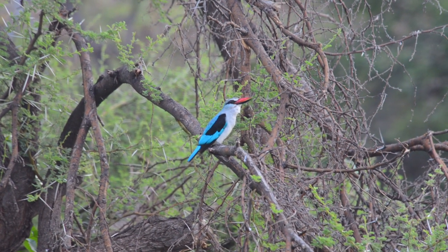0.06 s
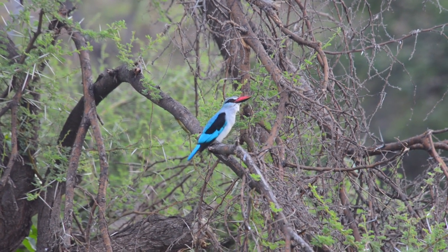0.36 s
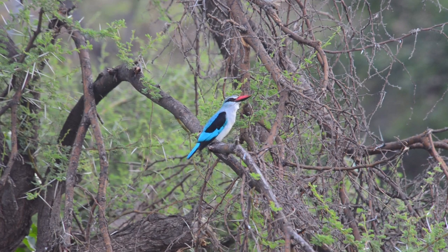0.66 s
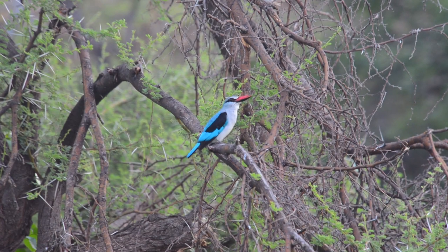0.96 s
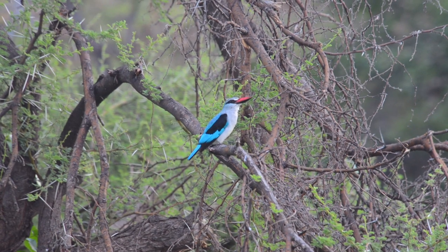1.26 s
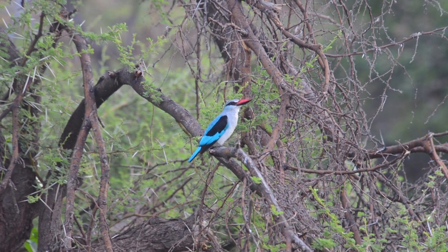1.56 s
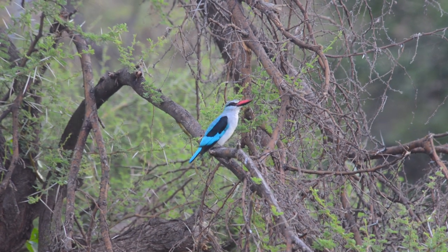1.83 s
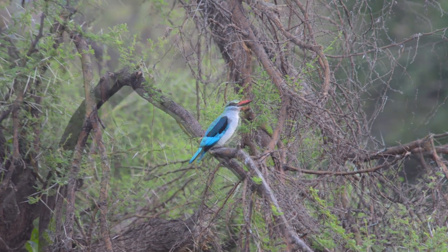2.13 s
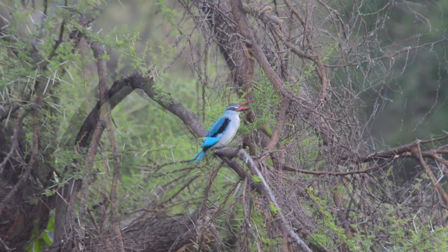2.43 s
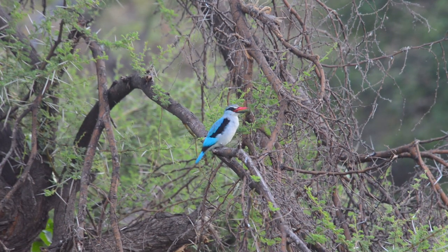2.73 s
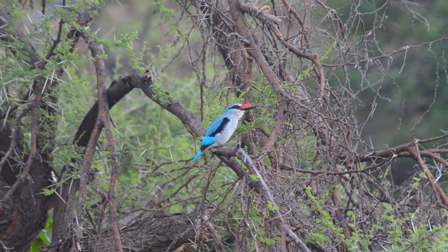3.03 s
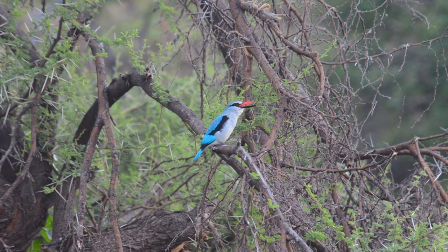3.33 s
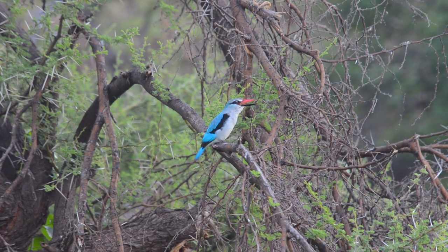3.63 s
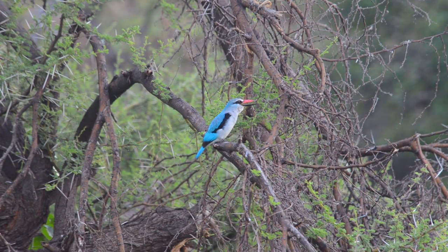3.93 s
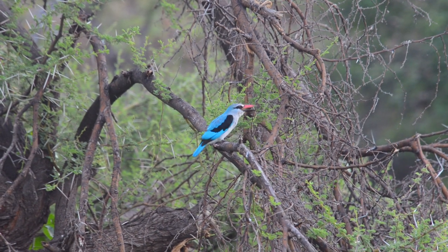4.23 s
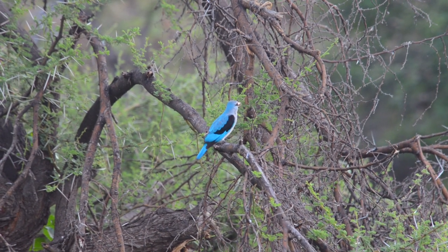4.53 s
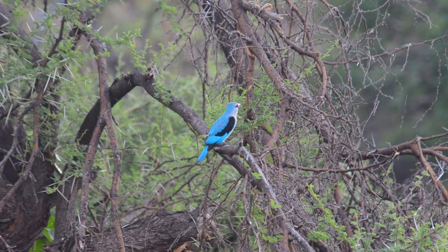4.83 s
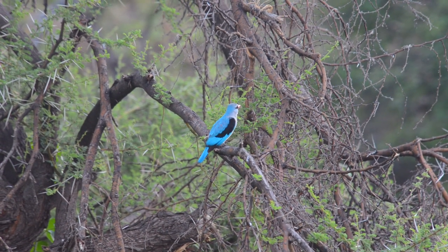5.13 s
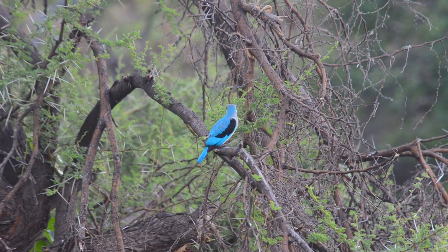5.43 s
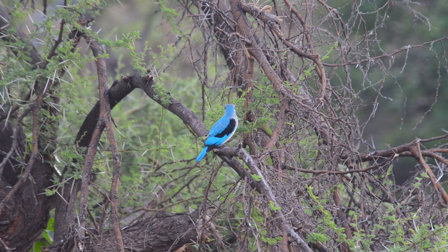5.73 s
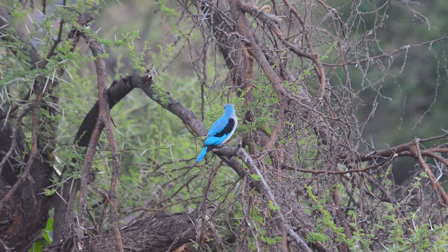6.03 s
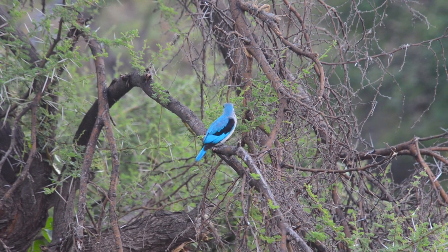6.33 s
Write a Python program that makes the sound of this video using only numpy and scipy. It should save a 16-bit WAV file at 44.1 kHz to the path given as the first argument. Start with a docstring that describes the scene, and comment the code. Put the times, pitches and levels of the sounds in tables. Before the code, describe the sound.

Close kingfisher trills and one loud, sharp note ring out above a faint chorus of chirping birds and purring doves in the bush.

```python
"""A woodland kingfisher on a branch ends one falling trill, gives a single sharp note, then a rattle
that clears into another trill. Its notes are sliding whistles that break into a rasp in the rattle
and as a trill runs out. Twigs and ground scatter its voice. Small birds chirp in the bush around it,
doves purr and coo further off, and something low grunts once over a soft outdoor hiss."""
import sys
import numpy as np
from scipy import signal
from scipy.fft import rfft, irfft
from scipy.io import wavfile

SR = 44100
rng = np.random.default_rng(int(sys.argv[2]) if len(sys.argv) > 2 else 0)


def wav_record(signal):
    """Record a signal, one row per channel, as 16-bit PCM in the file named by sys.argv[1]."""
    frames = np.transpose(np.atleast_2d(signal))
    bounded = np.clip(frames, -1, 1)
    # unit amplitude maps onto the largest positive 16-bit level
    quanta = np.round(bounded * 32767).astype(np.int16)
    wavfile.write(sys.argv[1], SR, quanta)


N = 285327
T = np.arange(N) / SR

# the kingfisher's trill and rattle notes: (time [s], level [dB])
TRILL_NOTES = [(.0038, -16), (.082, -19), (0.162, -15.5), (.242, -15), (0.3142, -17), (.392, -18),
               (.466, -21.5), (0.5425, -22), (.616, -26.5), (.69, -28.5), (3.6653, -8), (3.7198, -8.5),
               (3.77, -14), (3.8223, -15), (3.874, -16), (3.926, -18), (3.977, -17.5), (4.0286, -18.5),
               (4.082, -24), (4.131, -14.5), (4.1833, -16), (4.235, -15.5), (4.287, -15.5), (4.3394, -17),
               (4.3933, -15.5), (4.445, -15.5), (4.501, -15), (4.556, -14), (4.617, -13), (4.68, -12),
               (4.747, -10.5), (4.818, -11), (4.893, -13.5), (4.9713, -15), (5.0476, -16.5),
               (5.1247, -17.5), (5.201, -19), (5.2746, -22.5), (5.351, -24), (5.429, -23), (5.505, -23.5),
               (5.577, -26.5), (5.648, -29)]
# the pitch they land on, sinking through each trill: (time [s], pitch [Hz])
TRILL_PITCH = [(0, 2553), (.17, 2322), (.69, 2004), (3.666, 3445), (3.823, 2810), (4.03, 2763),
               (4.13, 2980), (4.4, 3190), (4.617, 3094), (4.68, 2858), (5.048, 2362), (5.274, 2310),
               (5.43, 2089), (5.648, 1946)]
# how clear or rough they are: (time [s], whistle length [s], closing rasp level [dB])
TRILL_VOICE = [(0, 0.025, -22), (.24, 0.018, -44), (.466, 0.021, -33.5), (.542, .016, -4.5),
               (.69, 0.023, 2), (3.666, .014, -5), (3.83, .0093, -5), (4.29, 0.0048, -4),
               (4.556, 0.0094, -3), (4.617, 0.014, -13), (4.68, .023, -40), (4.894, .018, -47),
               (5.429, 0.026, -43), (5.505, 0.017, 6)]
# what throat and bill let through of a whistle's upper harmonics: (frequency [Hz], gain [dB])
BILL_FILTER = [(5500, -24), (7400, -24.5), (8600, -40), (9900, -26.5), (11200, -49.5), (12300, -45),
               (14000, -53)]
# what the throat lets through of the rasp: (frequency [Hz], gain [dB])
THROAT_FILTER = [(900, -49), (1350, -14.5), (1900, -9.5), (2400, -2.5), (3100, -2.5), (4000, -14.5),
                 (5300, -9), (6500, -21), (8000, -24), (10500, -52), (14000, -53)]
# the tone of the outdoor hiss: (frequency [Hz], gain [dB])
AIR_COLOUR = [(15, -26), (25, -7), (116, 0), (349, -3), (550, -3), (895, -5.5), (1570, -6.5), (2080, -1),
              (2420, -8.5), (3100, -9), (4000, -5), (5100, -2), (6900, -11.5), (7800, -15.5),
              (11000, -19.5), (15500, -21)]
# puffs of a light breeze: (peak time [s], half length [s], level [dB])
BREEZE_PUFFS = [(2.21, .04, -55), (3.74, 0.27, -58), (4.047, .04, -48), (5.493, 0.054, -55.5)]
# the distant bird chorus: (time [s], chirp level [dB], background blur level [dB])
CHORUS_LEVELS = [(0, -50, -47.5), (.9, -40.5, -43.5), (1.3, -56, -47), (1.65, -60, -44.5),
                 (2, -54.5, -49.5), (3.2, -52.5, -64), (4.4, -42, -56), (5.4, -48.5, -50.5),
                 (6.47, -53.5, -58)]
# the tone of that chorus: (frequency [Hz], gain [dB])
CHORUS_TONE = [(1500, -23.5), (2100, -12), (2900, -11), (4200, -9), (5100, -4), (6400, -7.5), (7500, -17),
               (10000, -34)]
# small birds' downward slides: (time [s], length [s], starting pitch [Hz], level [dB])
SLIDE_CALLS = [(0.142, 0.11, 6600, -36.5), (0.864, 0.074, 6570, -34), (1.208, 0.035, 2495, -40.5),
               (1.519, 0.064, 5820, -40), (1.66, 0.085, 4550, -42), (2.963, 0.031, 3670, -37),
               (3.183, 0.06, 8000, -51), (5.423, 0.041, 6800, -39), (5.599, 0.038, 3950, -36),
               (5.794, 0.084, 6300, -42.5), (6.25, 0.073, 6500, -48)]
# their short, high "tsip" calls: (time [s], level [dB])
TSIP_CALLS = [(.294, -31), (1.204, -31), (1.554, -38), (1.64, -29), (1.702, -33.5), (2.059, -31.5),
              (2.667, -36.5), (3.164, -39), (4.673, -41)]
# a far whistler's rolled notes: (time [s], level [dB])
ROLL_CALLS = [(.6, -37), (1.216, -48), (1.697, -50), (2.16, -47), (2.888, -49), (3.735, -29), (4.719, -44),
              (6.22, -38.5)]
# small birds' thin whistles: (time [s], length [s], pitch [Hz], level [dB])
WHISTLE_CALLS = [(0.726, .2, 4470, -40), (0.995, .08, 5090, -31), (1.082, .1, 4980, -40),
                 (3.112, 0.062, 3460, -42), (5.1, 0.16, 7460, -49), (5.373, 0.062, 4730, -44),
                 (5.764, 0.062, 3454, -36)]
# their buzzes: (time [s], length [s], pitch [Hz], level [dB])
BUZZ_CALLS = [(.8, 0.17, 4450, -44), (1.405, 0.2, 6090, -42.5), (2.15, 0.11, 4350, -44),
              (2.928, .025, 4050, -34), (3.57, 0.13, 5120, -35.5), (3.877, 0.077, 5070, -36.5),
              (4.93, 0.05, 5200, -33), (5.513, 0.082, 5170, -39)]
# their steep "chip" calls: (time [s], level [dB])
CHIP_CALLS = [(0.812, -33.5), (1.066, -34.5), (1.316, -33.5), (1.563, -36), (1.814, -33), (2.067, -35.5),
              (2.435, -37), (2.672, -35), (5.02, -38.5), (5.277, -38), (5.53, -38.5), (6.033, -37.5),
              (6.284, -37.5)]
# short, soft far coos: (time [s], top pitch [Hz], level [dB])
FAR_COOS = [(.912, 1867, -41), (3.575, 908, -41), (4.047, 1920, -38), (4.368, 2120, -35), (4.83, 932, -42),
            (6.044, 943, -44), (6.25, 1055, -45), (6.351, 1098, -40), (6.452, 1043, -38)]
# purrs in a dove's phrase: (time into phrase [s], length [s], pitch [Hz], swing [Hz], level [dB])
PHRASE_PURRS = [(0, 0.382, 841, 160.5, -40.5), (0.481, 0.414, 883, 124.5, -49.5)]
# coos in that phrase: (time into phrase [s], length [s], top pitch [Hz], level [dB])
PHRASE_COOS = [(.485, 0.0426, 824, -47), (0.956, 0.069, 935, -39.5)]
# short, dry croaks: (time [s], level [dB])
CROAK_CALLS = [(3.439, -37), (3.476, -41), (3.535, -41.5), (3.572, -34)]


def undb(db):
    """Turn decibels into a number to multiply by."""
    return 10 ** (np.asarray(db) / 20)


def unit(x):
    """Scale x to an average strength (rms) of 1."""
    return x / np.sqrt(np.mean(x ** 2))


def add(out, start, x):
    """Mix x into out from the start time on."""
    i = max(0, int(start * SR))
    out[i:i + len(x)] += x[:max(0, N - i)]


def curves(table):
    """Join a timed table's points into one curve for each column after the time."""
    times, *columns = np.transpose(table)
    return [np.interp(T, times, column) for column in columns]


def response(hz, points):
    """How much a (frequency, gain) table lets through at hz."""
    frequencies, db = np.transpose(points)
    return undb(np.interp(np.log(hz + 1), np.log(frequencies), db))


def noise(points):
    """Noise of strength 1, coloured by a (frequency, gain) table."""
    spectrum = rfft(rng.standard_normal(N)) * response(np.fft.rfftfreq(N, 1 / SR), points)
    return unit(irfft(spectrum, N))


def wander(rate):
    """A random curve of strength 1 that heads for a new value rate times a second."""
    return unit(np.interp(T * rate, np.arange(N), rng.standard_normal(N)))


def phase_of(hz):
    """Add up a gliding pitch into the angle of its wave."""
    return 2 * np.pi * np.cumsum(hz) / SR


def gate(t, length, attack, release):
    """Fade in from time 0 and fade out around the given length."""
    opening = np.sin(np.pi / 2 * np.clip(t / attack, 0, 1))
    closing = np.sin(np.pi / 2 * np.clip((length - t) / release + .5, 0, 1)) ** 2
    return opening * closing


def whistle(phase, overtones_db):
    """A tone plus its harmonics: quieter tones at 2, 3, ... times its pitch."""
    overtones = sum(undb(db) * np.sin(k * phase) for k, db in enumerate(overtones_db, 2))
    return np.sin(phase) + overtones


def trill(scoop_hz=3750, scoop_share=.669, scoop_s=.0029, curl=.073, rasp_s=.01255):
    """Each kingfisher note scoops down onto its pitch; rough ones then break to a low, falling rasp."""
    out, t = np.zeros(N), T[:SR // 16]
    jitter, shimmer, grit = .02 * wander(2500), wander(900), noise(THROAT_FILTER)
    controls = np.array(curves(TRILL_PITCH) + curves(TRILL_VOICE))
    for start, db in TRILL_NOTES:
        here = int(start * SR) + np.arange(len(t))
        hz, clear_s, rasp_db = controls[:, here[0]]
        # short notes keep falling, long ones curl up again
        short = clear_s < .015
        bend = -.05 * t / clear_s if short else curl * np.clip(2 * t / clear_s - 1, 0, 2) ** 2
        pitch = hz * (1 + bend) + scoop_share * (scoop_hz - hz) * np.exp(-t / scoop_s)
        phase = phase_of(pitch * (1 + .31 * jitter[here]))
        # higher notes have a stronger second harmonic
        second_db = -21 + 17 * np.log2(hz / 2500)
        tone = whistle(phase, [second_db]) * gate(t, clear_s, .0083, .15 * clear_s)
        # the thin, husky top of the voice varies less from note to note
        top = sum(response(k * pitch, BILL_FILTER) * np.sin(k * phase) for k in range(3, 6))
        top_db = 1 - 1.5 * short - .2 * (db + 17.5) + 3.3 * shimmer[here]
        top *= undb(top_db) * gate(t, clear_s, .009, .38 * clear_s)
        # higher notes break to a higher rasp
        since_break = np.maximum(t - clear_s, 0)
        rasp_hz = 1880 * (hz / 3000) ** .369 * np.exp(-.334 * np.minimum(since_break / rasp_s, 1.2))
        rasp_phase = phase_of(rasp_hz * (1 + jitter[here]))
        # weak notes are duller; the throat delays each harmonic differently (k * k)
        dull_db = 8.5 * min(0, db + 20)
        buzz = sum(response(k * rasp_hz, THROAT_FILTER) * undb(dull_db * (k - 1))
                   * np.sin(k * rasp_phase + k * k) for k in range(1, 7))
        rasp = buzz + undb(dull_db - 17) * grit[here]
        rasp *= undb(rasp_db + 2 * shimmer[here]) * gate(since_break, rasp_s, .00016, .0038)
        add(out, start, undb(db) * (tone + top + rasp))
    return out


def perch(x):
    """The trunk and the ground each return one quick echo, a further tree a late one."""
    out = x.copy()
    for delay_s, db in [(.0065, -17.5), (.0135, -23.5), (.058, -42.5)]:
        add(out, delay_s, undb(db) * x)
    return out


def bush(x, twigs_db, twigs_s, trees_db, trees_s):
    """Add a quick scatter from twigs and a faint tail from trees; each takes its time to fall 60 dB."""
    colour = [(100, 6.5), (6000, -12), (10000, -4), (16000, -8.5)]
    echo = 0
    for db, decay_s, onset_s in ((twigs_db, twigs_s, .008), (trees_db, trees_s, .04)):
        shape = np.minimum(T / onset_s, 1) ** 2 * undb(-60 * T / decay_s)
        patchy_tail = noise(colour) * shape * undb(2.5 * wander(90))
        echo = echo + undb(db) * unit(patchy_tail) / np.sqrt(N)
    return x + signal.fftconvolve(x, echo[:2 * SR])[:N]


def air(hiss_db=-48, calm_db=-72):
    """A soft, steady hiss, with a light breeze rumbling in puffs underneath."""
    puffs = sum(undb(db) * np.exp(-((T - peak) / half) ** 2) for peak, half, db in BREEZE_PUFFS)
    rumble = noise([(20, 4), (50, 24.5), (100, 11), (200, -14), (1000, -79)])
    return noise(AIR_COLOUR) * undb(hiss_db) + rumble * (undb(calm_db) + puffs)


def chirp(length, from_hz, to_hz, waver, fade=.58):
    """A thin, unsteady, gliding whistle; fade is the share of its length spent dying away."""
    t = T[:int(1.6 * length * SR)]
    unsteady = np.interp(t * 700, np.arange(512), rng.standard_normal(512))
    pitch = from_hz * (to_hz / from_hz) ** (t / length) * (1 + waver * unsteady)
    return np.sin(phase_of(pitch)) * gate(t, length, .12 * length, fade * length)


def chorus(count=600, spread_db=8):
    """Many far birds: mostly falling chirps over a noisy blur of still further ones."""
    out = np.zeros(N)
    chirps_db, blur_db = curves(CHORUS_LEVELS)
    # they call all the time: one chirp somewhere in each short stretch
    for k, (when, high, long, fall, loud) in enumerate(rng.random((count, 5))):
        hz = 2800 + 4400 * high
        call = chirp(.006 + .02 * long, hz, hz * (1.08 - .36 * fall), waver=.014)
        gain = undb(spread_db * loud ** 2) * response(hz, CHORUS_TONE)
        add(out, (k + when) / count * N / SR, gain * call)
    voices = unit(bush(out, twigs_db=-4.5, twigs_s=.053, trees_db=-13, trees_s=.3))
    blur = noise(CHORUS_TONE) * undb(.54 * wander(18))
    return undb(chirps_db) * voices + undb(blur_db) * blur


def slides(octaves_per_s=9.7):
    """Small birds' whistles that all slide down at one pace."""
    out = np.zeros(N)
    for start, length, hz, db in SLIDE_CALLS:
        add(out, start, undb(db) * chirp(length, hz, hz / 2 ** (octaves_per_s * length), waver=.026))
    return out


def throb(call, rate_hz=175, depth=.46):
    """Shake a call's loudness fast enough to make it buzz."""
    return call * (1 + depth * np.sin(2 * np.pi * rate_hz * T[:len(call)]))


def tsips(high_hz=6150, low_hz=4850, flick_s=.0087):
    """A tiny upward flick, a quick stroke back down, then a buzzing slur."""
    out = np.zeros(N)
    for start, db in TSIP_CALLS:
        add(out, start - flick_s, undb(db - 7) * chirp(flick_s, low_hz, high_hz, waver=.012))
        add(out, start, undb(db) * chirp(.0187, high_hz, low_hz, waver=.023))
        add(out, start + .032, undb(db - 3) * throb(chirp(.036, 5450, 4780, waver=.06)))
    return out


def purr(length, hz, swing_hz, rolls_per_s=35, unsteady_hz=22):
    """A note whose pitch and loudness roll quickly; it starts high and soon settles."""
    t = T[:int(1.2 * length * SR)]
    roll = (t * rolls_per_s) % 1
    high_start = .75 * np.exp(-t / .09)
    pitch = hz + swing_hz * (1 - 2 * roll + high_start) + unsteady_hz * wander(200.6)[:len(t)]
    return np.sin(phase_of(pitch)) * np.sin(np.pi * roll) * gate(t, length, .0033, .33 * length)


def far_whistler():
    """A far bird that keeps to one rolled note."""
    out = np.zeros(N)
    for start, db in ROLL_CALLS:
        add(out, start, undb(db) * purr(length=.122, hz=2040, swing_hz=40))
    return out


def thin_whistles(sag=.019):
    """Small birds hold a note that sinks just a little."""
    out = np.zeros(N)
    for start, length, hz, db in WHISTLE_CALLS:
        add(out, start, undb(db) * chirp(length, hz, hz * (1 - sag), waver=.011, fade=.34))
    return out


def buzzes(sag=.019):
    """Held notes made rough by a shaky pitch and a fast throb."""
    out = np.zeros(N)
    for start, length, hz, db in BUZZ_CALLS:
        add(out, start, undb(db) * throb(chirp(length, hz, hz * (1 - sag), waver=.043, fade=.55)))
    return out


def chips():
    """Very short, pure whistles that drop steeply."""
    out = np.zeros(N)
    for start, db in CHIP_CALLS:
        add(out, start, undb(db) * chirp(length=.0135, from_hz=5450, to_hz=2650, waver=.008, fade=.85))
    return out


def coo(length, hz, arch=.374):
    """A soft note whose pitch rises and falls in an arch."""
    t = T[:int(1.2 * length * SR)]
    pitch = hz * (1 - arch * (t / length - .42) ** 2)
    return np.sin(phase_of(pitch)) * gate(t, length, .074 * length, .87 * length)


def far_coos():
    """Short, soft far coos: some open the dove's purrs, others stand alone."""
    out = np.zeros(N)
    for start, hz, db in FAR_COOS:
        add(out, start, undb(db) * coo(length=.043, hz=hz))
    return out


def doves(count=4, first_s=2.228, period_s=1.345, heard_from_s=2.31):
    """One phrase over and over: a strong purr, a soft purr opening with a low coo, a higher coo."""
    out = np.zeros(N)
    for phrase in first_s + period_s * np.arange(count):
        for after, length, hz, swing_hz, db in PHRASE_PURRS:
            add(out, phrase + after, undb(db) * purr(length, hz, swing_hz))
        for after, length, hz, db in PHRASE_COOS:
            add(out, phrase + after, undb(db) * coo(length, hz))
    return out * (T > heard_from_s)


def sharp_note(start_s=2.799, level_db=-7.5, from_hz=4310, to_hz=2668, attack_s=.026, fade_s=.099):
    """One loud kingfisher whistle swells, slides down to a held pitch and fades, growing purer."""
    t = np.clip(T - start_s, 0, 3 * fade_s)
    glide_hz = to_hz + (from_hz - to_hz) * np.exp(-(t / .045) ** 1.35)
    pitch = glide_hz * (1 + .0029 * wander(600))
    tone = whistle(phase_of(pitch), [db - 45 * t for db in (-13, -30, -43, -44)])
    swell_db = -17 * np.maximum(1 - (t / attack_s) ** 2.2, 0)
    fade_db = -16 * (np.maximum(t - attack_s, 0) / fade_s) ** 2.4
    flutter_db = wander(150)
    return tone * undb(level_db + swell_db + fade_db + flutter_db) * (T > start_s)


def grunt(start_s=3.335, gain_db=-47, from_hz=148, to_hz=89.4, length_s=.21, fade_db_per_s=75):
    """A far, low, falling voice whose three harmonics are shaped by the throat."""
    t = np.maximum(T - start_s, 0)
    hz = to_hz + (from_hz - to_hz) * np.exp(-(t / .062) ** 2)
    throat = [(85, 11), (130, -1), (190, 14.5), (260, -7), (400, -41)]
    voice = sum(response(k * hz, throat) * np.sin(k * phase_of(hz)) for k in range(1, 4))
    return voice * undb(gain_db - fade_db_per_s * t) * gate(t, length_s, .033, length_s / 2)


def croaks(decay_s=.01):
    """Toneless rasps: bursts of noise that start at once and die quickly."""
    rasp = noise([(700, -17), (1200, -2.5), (1600, 7), (2300, -9), (3100, -5.5), (5000, -6), (9000, -37)])
    return rasp * sum(undb(db) * (T > start) * np.exp(-np.abs(T - start) / decay_s)
                      for start, db in CROAK_CALLS)


def scene():
    """The kingfisher close by, the other voices deeper in the bush."""
    kingfisher = perch(sharp_note() + trill())
    kingfisher = bush(kingfisher, twigs_db=-6, twigs_s=.039, trees_db=-19.5, trees_s=1)
    small_birds = chips() + tsips() + slides() + thin_whistles() + buzzes()
    flutter = undb(3 * wander(300) + .5)
    near = bush(small_birds * flutter, twigs_db=-4, twigs_s=.062, trees_db=-6.5, trees_s=.76)
    far_voices = doves() + far_coos() + far_whistler() + croaks()
    far = bush(far_voices, twigs_db=-9.5, twigs_s=.26, trees_db=-16, trees_s=1)
    return (kingfisher + near + far + grunt() + chorus() + air())[None]


def record(dry, dip_at_s=2.299, dip_half_s=.006, dip_db=-15, top_hz=15900):
    """The level dips for an instant, and the recorder cuts off the highest treble."""
    dip = undb(dip_db * np.exp(-((T - dip_at_s) / dip_half_s) ** 2))
    low_pass = signal.ellip(10, .2, 70, top_hz, fs=SR, output="sos")
    return signal.sosfilt(low_pass, dry * dip)


dry = scene()
out = record(dry)
wav_record(out)
```